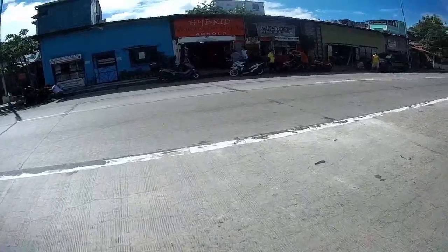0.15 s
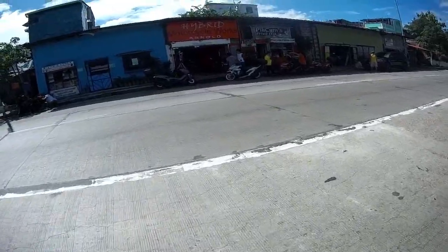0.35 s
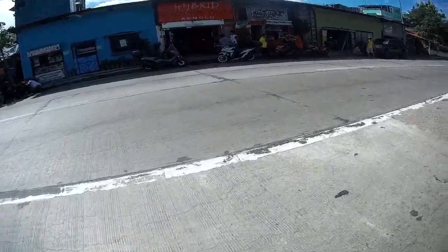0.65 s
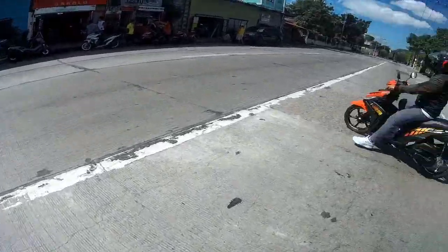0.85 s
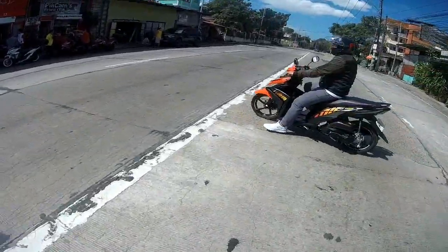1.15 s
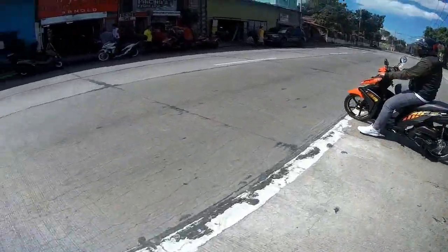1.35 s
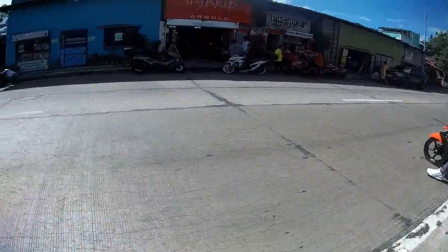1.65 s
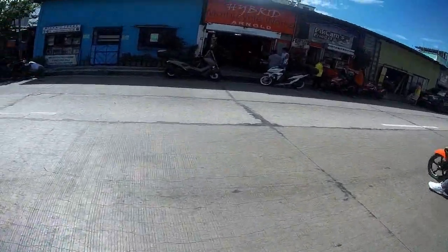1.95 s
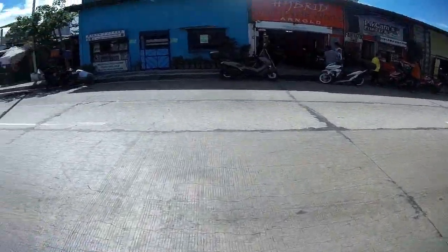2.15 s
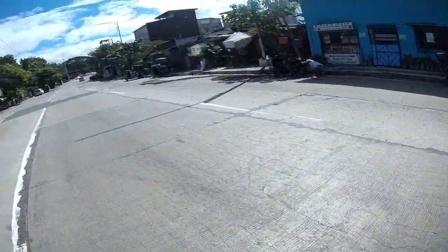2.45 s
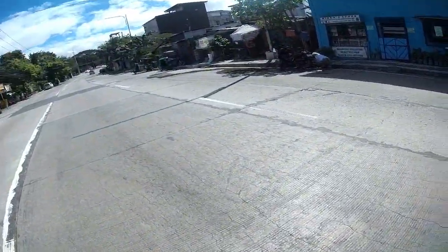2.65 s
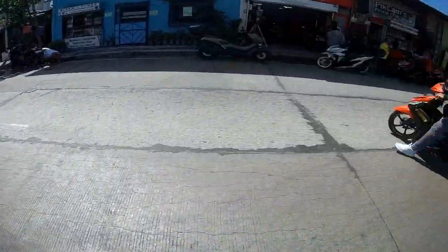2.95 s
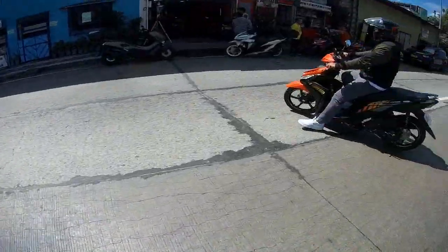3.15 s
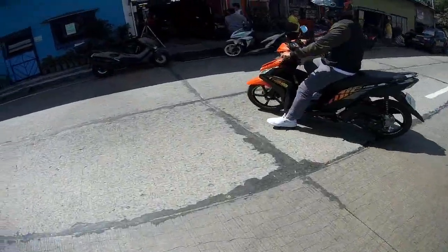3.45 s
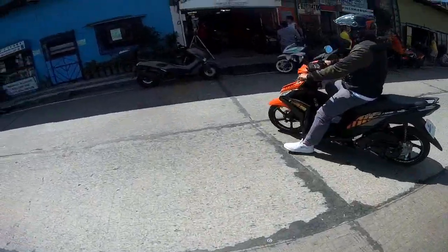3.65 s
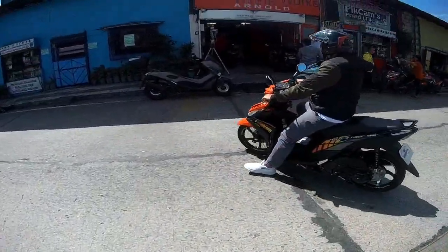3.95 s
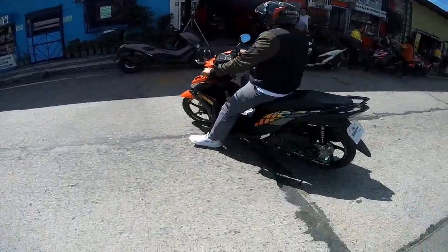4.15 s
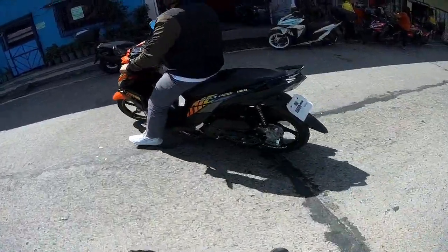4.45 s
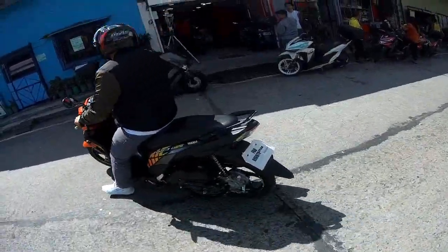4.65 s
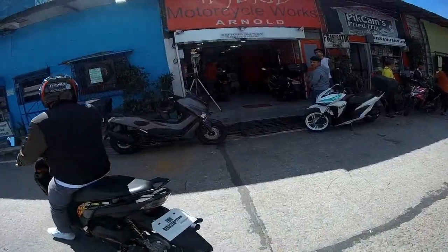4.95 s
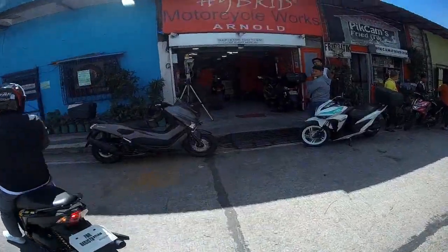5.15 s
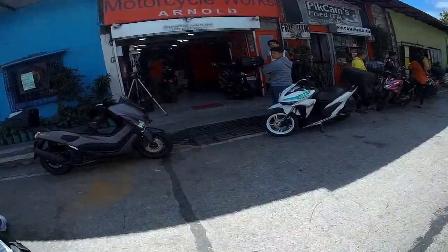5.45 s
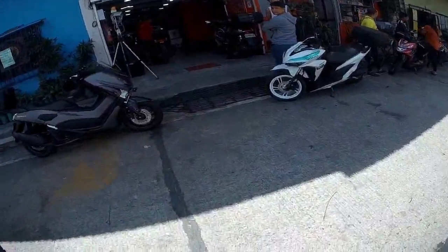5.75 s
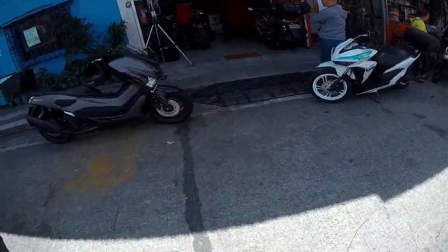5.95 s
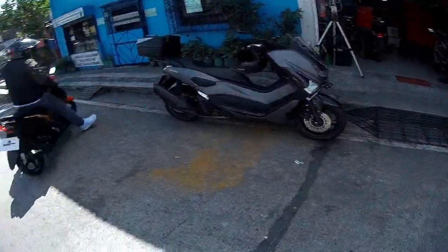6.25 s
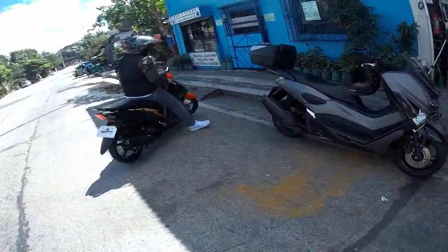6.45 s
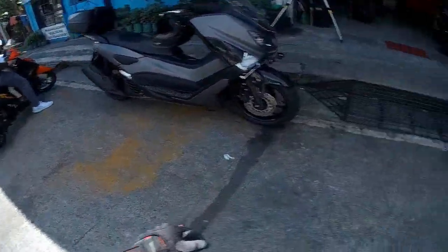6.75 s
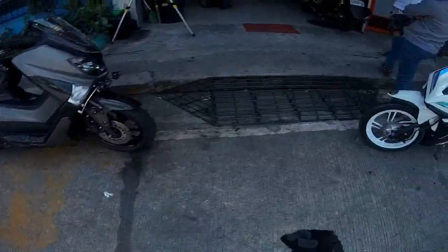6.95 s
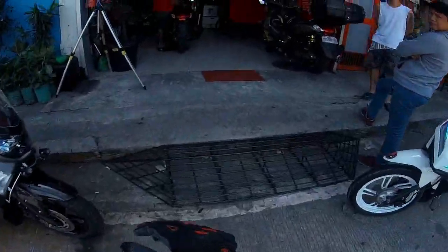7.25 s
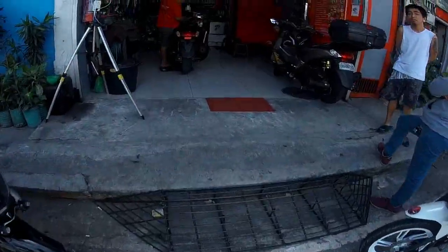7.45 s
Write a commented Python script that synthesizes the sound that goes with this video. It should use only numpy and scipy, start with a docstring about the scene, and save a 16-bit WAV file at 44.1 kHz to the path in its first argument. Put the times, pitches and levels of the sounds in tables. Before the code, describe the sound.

Low wind rumble and light street noise run throughout, heard from a body-worn microphone. The wearer's steps thump dully about twice a second, with scattered clicks and knocks from the mount. A small single-cylinder scooter putters nearby, its revs raised at the start and blipped again at about 1.4 seconds, with a mechanical whirr and a thin, high belt whine that comes and goes. The strongest gust hits at about 2.5 seconds, with a faint brake squeal inside it. More wind booms between 3 and 4 seconds, and a small bird gives a quick, faint run of chirps around 4 seconds. Near 5 seconds a gentler blip comes with a raspy exhaust and more whine, then the engine settles to an idle. Another gust swells around 6.4 seconds. From 7 seconds to the end, clothing rubs briefly against the microphone over the idling engine.

```python
"""Street noise and an idling engine are heard from a body-worn camera: wind rumbles on its case, the
wearer's steps thump it and its mount clicks. A single-cylinder scooter creeps across the concrete
road on two blips of throttle, each firing ringing its silencer, its drive belt singing. A brake
squeals faintly in a gust, then a small bird chirps. After a third, gentler blip the tailpipe rasps
and the scooter idles at the kerb; near the end, clothing rubs the camera."""
import sys
import numpy as np
from scipy import signal
from scipy.fft import rfft, irfft
from scipy.io import wavfile
from scipy.ndimage import map_coordinates

SR = 44100
rng = np.random.default_rng(int(sys.argv[2]) if len(sys.argv) > 2 else 0)


def generate_wav(sig):
    """Save sig (samples, or channels by samples) to the path in sys.argv[1] as 16-bit PCM at SR."""
    pcm = np.round(np.clip(np.atleast_2d(sig).T, -1, 1) * 32767).astype(np.int16)
    wavfile.write(sys.argv[1], SR, pcm)


N = 335160
TIME = np.arange(N) / SR


def from_db(db):
    """Decibels to amplitude ratio."""
    return 10 ** (np.asarray(db) / 20)


def rms_one(x):
    """Normalisation to unit rms."""
    return x / np.sqrt(np.mean(x ** 2) + 1e-20)


def in_time(rows):
    """Linear interpolation between (time, value) points."""
    return np.interp(TIME, *np.transpose(rows))


def smooth(x, hz, kind="low", order=2):
    """Butterworth low- or high-pass filter."""
    return signal.sosfilt(signal.butter(order, hz, kind, fs=SR, output="sos"), x + 1e-18)


def drift(rate_hz):
    """Smooth random modulation of unit rms."""
    knots = rng.standard_normal(4000)
    return rms_one(map_coordinates(knots, [TIME * rate_hz + 2], order=3))


def swell(peak_s, rise_s, fall_s, order=1):
    """Growth to 1 and decay: exponential at order 1, Gaussian at order 2."""
    return np.exp(-np.maximum((peak_s - TIME) / rise_s, (TIME - peak_s) / fall_s) ** order)


def swells(rows, order=1):
    """Incoherent sum of swells: their powers add."""
    return np.sqrt(sum((from_db(db) * swell(s, rise, fall, order)) ** 2 for s, db, rise, fall in rows))


def resonate(x, hz, width_hz):
    """Two-pole resonator with unit peak gain."""
    r = np.exp(-np.pi * width_hz / SR)
    feedback = [1, -2 * r * np.cos(2 * np.pi * hz / SR), r * r]
    return signal.lfilter(np.array([1, 0, -1]) * (1 - r * r) / 2, feedback, x + 1e-18)


def excite(force, modes):
    """Forced vibration: noise under a force envelope drives each mode, two resonators in cascade."""
    rings = np.zeros(N)
    for hz, width, db in modes:
        once = resonate(force * rng.standard_normal(N), hz, width)
        rings += from_db(db) * rms_one(resonate(once, hz, width))
    return rms_one(rings)


def coloured(spectrum):
    """Spectral shaping of white noise, at unit rms."""
    hz, db = np.transpose(spectrum)
    bins_hz = np.maximum(np.arange(N // 2 + 1) * SR / N, 1)
    gain = from_db(np.interp(np.log(bins_hz), np.log(hz), db))
    return rms_one(irfft(rfft(rng.standard_normal(N)) * gain, N))


def rough_tone(hz, width_hz):
    """Narrow-band noise: a tone of wandering amplitude and phase, at unit rms."""
    phase = 2 * np.pi * np.cumsum(hz * np.ones(N)) / SR
    in_phase, quadrature = smooth(rng.standard_normal((2, N)), width_hz)
    return rms_one(in_phase * np.cos(phase) + quadrature * np.sin(phase))


def cycles(firings_hz, wobble):
    """Engine phase in cycles: the integral of a firing rate that combustion makes unsteady."""
    return np.cumsum(firings_hz * (1 + wobble * drift(12))) / SR


def strokes(cycle, spread_db):
    """Impulse train: one impulse of random strength per cycle."""
    sizes = from_db(spread_db * rng.standard_normal(1000))
    turn = np.floor(cycle).astype(int)
    return np.diff(turn, prepend=turn[0]) * sizes[turn]


def gate(cycle, sharpness, rest):
    """Periodic envelope of unit rms: exponential decay within each cycle."""
    return rms_one(rest + np.exp(-sharpness * (cycle % 1)))


def road_echo(x, lag_s=.0028, swing=0.1236, strength=0.43):
    """Comb filtering: the reflection off the concrete interferes, its lag shifting as the camera moves."""
    lag = lag_s * SR * (1 + swing * drift(.9))
    reflection = map_coordinates(x, [np.arange(N) - lag], order=3)
    return (x + strength * reflection) / np.hypot(1, strength)


# Street noise spectrum: frequency_hz, density_db
STREET_SPECTRUM = [(20, 12.5), (100, -4), (300, 1), (700, -4.5), (1100, -8), (1500, -6.5), (1900, -11),
                   (3000, -6.5), (4500, -13.5), (8000, -23), (9300, -24), (15000, -25.5)]
def street():
    """Broadband ambient noise interferes with its ground reflection."""
    return from_db(-41.5) * road_echo(coloured(STREET_SPECTRUM), lag_s=.004, swing=0.097, strength=0.59)


def bird(start_s=3.975, spacing_s=.069, length_s=0.018, low_hz=4700, high_hz=6400, count=6):
    """Frequency modulation: quick upward sweeps, each a little detuned, loudest in mid-run."""
    out, t = np.zeros(N), TIME[:int(length_s * SR)]
    for k, shift in enumerate(1 + 0.077 * rng.standard_normal(count)):
        sweep = signal.chirp(t, low_hz * shift, length_s, high_hz * shift) * np.hanning(len(t))
        level_db = -51 + 8 * np.sin(np.pi * (k + .5) / count)
        start = int((start_s + k * spacing_s) * SR)
        out[start:start + len(t)] += from_db(level_db) * sweep
    return out


# Chirps, squeaks and hoots: start_s, level_db, pitch_hz, length_s
BRIEF_TONES = [(0.56, -51, 6500, .04), (1.195, -52, 5300, 0.036), (3.198, -43, 1366, 0.37),
               (3.741, -50, 6170, 0.044), (6.256, -41, 1420, .11)]
def brief_tones():
    """Narrow-band noise in half-sine envelopes: two faint high chirps, then thin hoots and a squeak."""
    return sum(from_db(db) * np.sin(np.pi * np.clip((TIME - s) / length, 0, 1))
               * rough_tone(hz, width_hz=77) for s, db, hz, length in BRIEF_TONES)


# Silencer resonances: pitch_hz, width_hz, gain_db
SILENCER_MODES = [(55, 40, 2), (95, 50, -1), (132, 40, -2), (206, 20, -11), (250, 30, -8)]
# Exhaust gas spectrum: frequency_hz, density_db
PUFF_SPECTRUM = [(60, 11.5), (150, 10), (230, -16), (400, -5.5), (600, -21), (1000, -11), (2000, -36),
                 (5000, -34)]
def exhaust(cycle):
    """Impulse response: each firing rings the silencer and puffs; the air box gulps half a cycle later."""
    firing = strokes(cycle, spread_db=2.5)
    rings = sum(from_db(db) * resonate(firing * from_db(1.5 * drift(20)), hz, width)
                for hz, width, db in SILENCER_MODES)
    pipe = rms_one(smooth(rings, 160, order=4))
    air_box = resonate(strokes(cycle + .5, spread_db=3.5), hz=62, width_hz=24)
    gulp = rms_one(smooth(air_box, 76))
    puff = coloured(PUFF_SPECTRUM) * gate(cycle, sharpness=8.1, rest=0.11)
    return -pipe + from_db(1) * gulp + from_db(-21) * puff


def parked_scooter():
    """Attenuation with distance: a second engine idles farther off."""
    return from_db(-34) * exhaust(cycles(firings_hz=14.2, wobble=.02))


# Turbulence spectrum: frequency_hz, density_db
WIND_SPECTRUM = [(12, -7), (28, 21.5), (65, 11), (120, -8.5), (250, -3.5), (400, -5), (600, -8.5),
                 (1000, -17.5), (1500, -21.5), (2000, -27.5), (8000, -54)]
# Camera case resonances: pitch_hz, width_hz, gain_db
CASE_MODES = [(33.6, 17, -0.5), (59.8, 39.4, 1), (203.9, 33, -16.5), (253, 33, -18.5), (344.4, 73, -19.5),
              (567, 123, -24), (782, 66, -32)]
# Gusts: peak_s, rush_db, boom_db, rise_s, fall_s
GUSTS = [(1.5, -31, -20, 0.19, 0.17), (2.45, -16, -14, 0.1, 0.081), (2.56, -14.5, -13, 0.091, 0.083),
         (3.05, -26, -22.5, 0.32, 0.7), (3.7, -31.5, -13, 0.37, 0.42), (4.95, -29.5, -27, 0.58, 0.55),
         (5.9, -47, -19, .05, 0.058), (6.36, -36, -18.5, 0.23, .35)]
def wind(breeze_db=-29):
    """Turbulence and cavity resonance: eddies rush over the case and boom in its hollows."""
    rush_gusts = swells([(s, db, rise, fall) for s, db, _, rise, fall in GUSTS], order=2)
    boom_gusts = swells([(s, db, rise, fall) for s, _, db, rise, fall in GUSTS], order=2)
    rush = np.hypot(from_db(breeze_db), rush_gusts) * from_db(drift(45)) * coloured(WIND_SPECTRUM)
    boom = np.hypot(from_db(breeze_db), boom_gusts) * excite(1, CASE_MODES)
    return rush + boom


# Resonances of the rubbed case: pitch_hz, width_hz, gain_db
RUB_MODES = [(3100, 700, -32.5), (3600, 1040, 10), (6230, 3200, -1.5), (7460, 860, -8.5)]
# Rubs: peak_s, level_db, rise_s, fall_s
RUBS = [(.408, -37, 0.0076, 0.047), (7.03, -39, 0.072, 0.077), (7.45, -33.5, 0.026, 0.037),
        (7.58, -30.5, 0.053, 0.057)]
def clothing():
    """Sliding friction: cloth and strap rub the case with an uneven force."""
    return swells(RUBS) * excite(from_db(3.8 * drift(250)), RUB_MODES)


# Heel strikes felt through the body: start_s, peak_db
STEPS = [(.005, -7.5), (0.413, 2), (.911, 6.5), (1.393, -4.5), (1.918, 3.5), (2.42, -6.5), (2.548, -1),
         (2.941, -3.5), (3.468, -7.5), (4.043, -4.5), (4.585, 1), (5.152, -8.5), (5.696, -4), (6.214, -1.5),
         (6.898, -5), (7.372, 0.5)]
def footsteps(sway_hz=29, bounce_hz=60, cutoff_hz=50.8, cutoff_hz_per_db=2.9):
    """Damped oscillation: each step swings the camera on its strap; harder steps pass more bounce."""
    out = np.zeros(N)
    for s, db in STEPS:
        start = int(s * SR)
        t = TIME[:min(SR // 2, N - start)]
        sway = np.sin(2 * np.pi * sway_hz * (1 + 0.168 * rng.standard_normal()) * t)
        bounce = np.sin(2 * np.pi * bounce_hz * (1 + .1 * rng.standard_normal()) * t)
        damping = np.exp(-(t / 0.089) ** 2)   # friction against the chest
        thump = smooth((sway + bounce) * damping, max(cutoff_hz + cutoff_hz_per_db * db, 20))
        out[start:start + len(t)] += from_db(db) * thump / np.abs(thump).max()
    return out


# Clicks and knocks of the mount: start_s, ring_peak_db, pitch_hz, t60_s, crack_relative_db
CLICKS = [(0.399, -21.5, 3540, 0.0094, -21), (0.908, -16, 550, 0.01, -28), (0.905, -9, 123, 0.067, -35),
          (1.137, -9, 460, 0.0078, -36), (1.137, -4, 97, 0.061, -26), (2.543, -12.5, 1510, 0.0068, -7),
          (2.547, -12, 128, 0.11, -30), (3.408, -7.5, 3508, 0.0068, -24.5), (3.411, -17.5, 278, 0.038, -30),
          (4.572, -26.5, 3900, 0.0083, -3), (4.952, -22.5, 266, 0.059, -18), (6.651, -28, 3540, 0.011, -4),
          (6.673, -28, 1500, .0073, 8), (6.77, -25.5, 3893, 0.0072, -7), (7.373, -17, 3280, .0069, -15)]
def mount_clicks(crack_t60_s=0.061, rise_cycles=0.68):
    """Free vibration: plastic parts slip with a broadband crack and ring briefly."""
    out, t = np.zeros(N), TIME[:SR // 10]
    for s, db, hz, t60, crack_db in CLICKS:
        onset = 1 - np.exp(-hz * t / rise_cycles)
        ring = np.sin(2 * np.pi * hz * t) * from_db(-60 * t / t60) * onset
        noise = smooth(rng.standard_normal(len(t)), min(2 * hz, SR / 3), order=4)
        crack = noise * from_db(crack_db - 60 * t / crack_t60_s)
        start = int(s * SR)
        out[start:start + len(t)] += from_db(db) * (ring / np.abs(ring).max() + crack)[:N - start]
    return out


# Brake resonances: pitch_hz, width_hz, gain_db
BRAKE_MODES = [(5600, 270, -3), (6260, 258, -2), (6970, 860, -5), (9200, 340, -15)]
# Squeals: peak_s, level_db, rise_s, fall_s
SQUEALS = [(2.59, -41.5, 0.053, 0.081), (2.81, -50.5, .04, 0.11)]
def brake():
    """Friction drives the high modes of the brake into a faint squeal."""
    return swells(SQUEALS) * excite(from_db(1.5 * drift(30.5)), BRAKE_MODES)


def gear(octaves_above_idle, idle_db=-56, db_per_octave=9.5):
    """Narrow-band whine of the reduction gear: constant in pitch, louder with speed."""
    return from_db(idle_db + db_per_octave * octaves_above_idle) * rough_tone(hz=1495, width_hz=59)


# Swells of the belt tone: peak_s, level_db, rise_s, fall_s
BELT_SONGS = [(1.29, -33, 0.19, 0.19), (3.25, -40, 0.18, 0.78), (4.48, -33, 0.63, 0.49),
              (4.95, -35.5, 0.13, .25), (6.35, -39, 0.16, 0.36), (7.08, -37, .12, .2)]
def belt(pitch_hz=3025, sag_hz=274):
    """A modulated tone: the drive belt flutters, and sags in pitch once as the clutch takes load."""
    load = swell(peak_s=4.82, rise_s=.22, fall_s=.22, order=2)
    flutter = from_db(0.88 * drift(30))
    return swells(BELT_SONGS) * flutter * rough_tone(pitch_hz - sag_hz * load, width_hz=83)


# Cooling fan resonances: pitch_hz, width_hz, gain_db
FAN_MODES = [(4585, 130, -0.5), (5570, 1200, 1.5), (6550, 400, -3), (7680, 1500, 5.5)]
# The grille faces the camera: peak_s, level_db, rise_s, fall_s
FAN_PASSES = [(.05, -46, .2, 0.11), (1.45, -51, 0.066, .12), (5.95, -54.5, 0.48, .5)]
def fan(clatter, floor_db=-60):
    """Directivity: the fan's hiss swells whenever its grille faces the camera."""
    return np.hypot(from_db(floor_db), swells(FAN_PASSES)) * excite(clatter, FAN_MODES)


# Tailpipe resonances: pitch_hz, width_hz, gain_db
RASP_MODES = [(1293, 230, 0), (2435, 600, 8), (2760, 600, 6.5)]
# Rasps of the tailpipe: peak_s, level_db, rise_s, fall_s
RASPS = [(4.75, -37, 0.44, 0.47), (5.23, -40.5, 0.12, 0.088), (6.58, -43, .2, 0.14),
         (7.56, -45.5, 0.27, 0.19)]
def tailpipe_rasp(cycle):
    """Pulsed noise: noise gated at the firing rate rings the tailpipe's resonances in brief rasps."""
    return swells(RASPS) * excite(gate(cycle, sharpness=2.6, rest=0.45), RASP_MODES)


# Resonances of the whirr: pitch_hz, width_hz, gain_db
WHIRR_MODES = [(1383, 244, -11), (2190, 810, -11), (2745, 115, -5.5), (3025, 620, 1.5), (3297, 550, -3.5),
               (4395, 140, -17.5), (5400, 3600, -22.5), (7950, 880, -25)]
def whirr(clatter, octaves_above_idle, idle_db=-35, db_per_octave=6):
    """Forced vibration of the engine's moving parts, louder with speed."""
    return from_db(idle_db + db_per_octave * octaves_above_idle) * excite(clatter, WHIRR_MODES)


# Resonances of the bark: pitch_hz, width_hz, gain_db
BARK_MODES = [(420, 114, 3), (1370, 610, 1), (2160, 1000, -19), (4400, 600, -9.5), (7240, 1100, -15)]
# Throttle blips: top_speed_s, extra_firings_hz, spin_up_s, run_down_s, bark_db
BLIPS = [(.1, 12.9, 0.86, 0.6, -46), (1.45, 13, 0.31, 0.6, -28.5), (4.921, 6, .27, .33, -41)]
def bark(cycle, lead_s=.1, rise_s=0.053, fall_s=0.16):
    """Pulsed noise excites resonances in a brief rattling bark just before each blip reaches top speed."""
    throttle = swells([(s - lead_s, db, rise_s, fall_s) for s, *_, db in BLIPS])
    return throttle * excite(gate(cycle, sharpness=8.2, rest=0.21), BARK_MODES)


# How near and unshadowed the scooter is: time_s, gain_db
NEARNESS = [(0, -3.5), (.85, -9), (1.38, 0), (2.05, -11.5), (2.35, -4), (2.8, -10), (3.4, -4.5),
            (4.2, -3.5), (4.7, -2), (5.6, -6), (6.5, -3), (7.6, -6)]
# Exhaust directivity, loudest from behind the scooter: time_s, gain_db
BEHIND = [(0, -3), (.8, 0), (3.1, -.5), (3.7, 5), (5.4, 6), (6.6, 4), (7.6, 0)]
def scooter(idle_hz=14.4):
    """Phase locking: one crankshaft times the exhaust beat, clatter, bark and rasp."""
    firings_hz = idle_hz + sum(extra * swell(s, up, down) for s, extra, up, down, _ in BLIPS)
    octaves_above_idle = np.log2(firings_hz / idle_hz)
    cycle = cycles(firings_hz, wobble=.012)
    near_db = in_time(NEARNESS)
    beat = from_db(-27 + .4 * near_db + in_time(BEHIND)) * exhaust(cycle)
    clatter = gate(2 * cycle, sharpness=2.7, rest=1.65) * from_db(2.0 * drift(300) + 1.5 * drift(27))
    machinery = from_db(near_db) * whirr(clatter, octaves_above_idle) + fan(clatter)
    gas_noise = bark(cycle) + tailpipe_rasp(cycle)
    return beat + gear(octaves_above_idle) + belt() + road_echo(machinery + gas_noise)


def scene():
    """Superposition of all sources in one channel."""
    faint_noises = clothing() + brake() + street()
    engines = scooter() + parked_scooter()
    on_camera = wind() + footsteps() + mount_clicks()
    return (faint_noises + engines + on_camera + bird() + brief_tones())[None]


def record(dry, limit_db=-1, release_db_per_s=45, cutoff_hz=15100):
    """Limiting: the gain ducks on the heaviest thumps and recovers; peaks clip and the top is cut."""
    x = smooth(dry[0], 14.7, "high")
    over_db = np.maximum(20 * np.log10(np.abs(x) + 1e-9) - limit_db, 0)
    held_db = np.maximum.accumulate(over_db + release_db_per_s * TIME) - release_db_per_s * TIME
    limited = np.clip(x * from_db(-smooth(held_db, 35, order=1)), -1, 1)
    low_pass = signal.ellip(12, .1, 80, cutoff_hz, fs=SR, output="sos")
    return signal.sosfilt(low_pass, limited)[None]


dry = scene()
out = record(dry)
generate_wav(out)
```